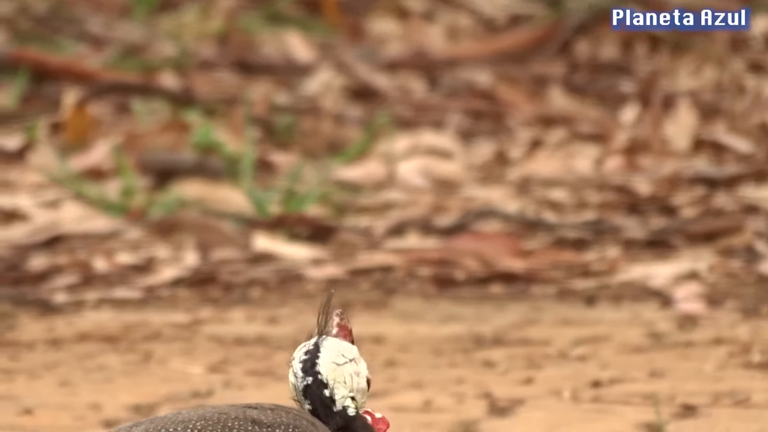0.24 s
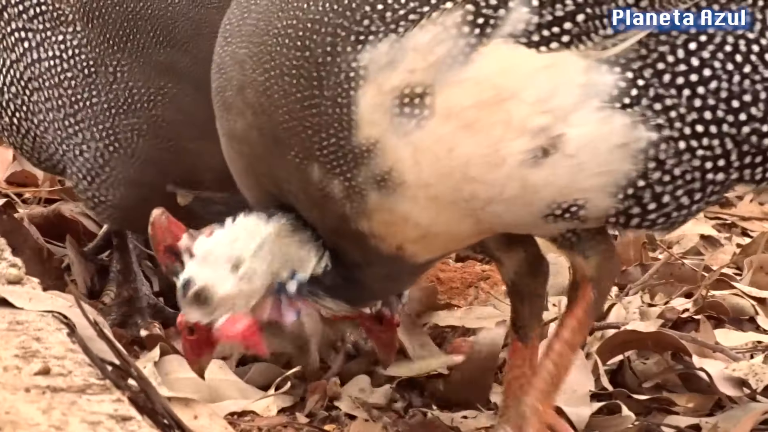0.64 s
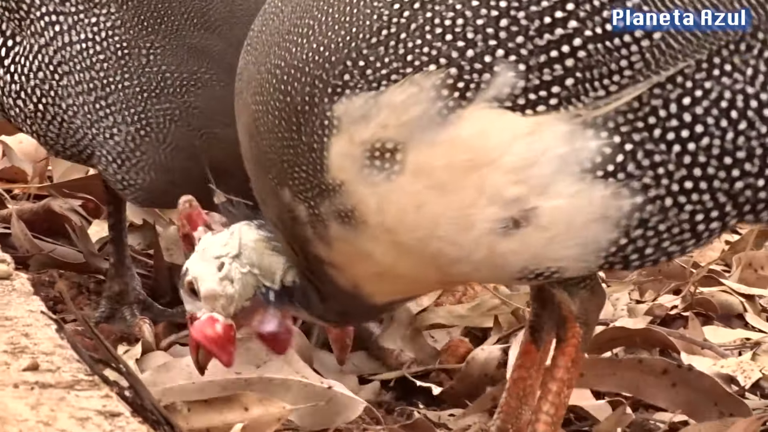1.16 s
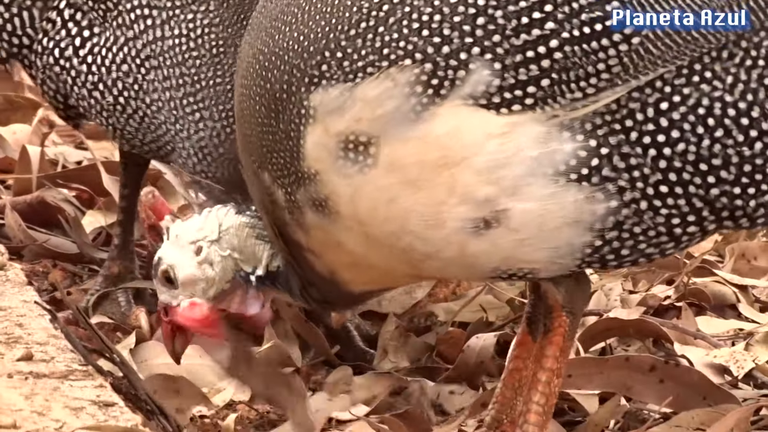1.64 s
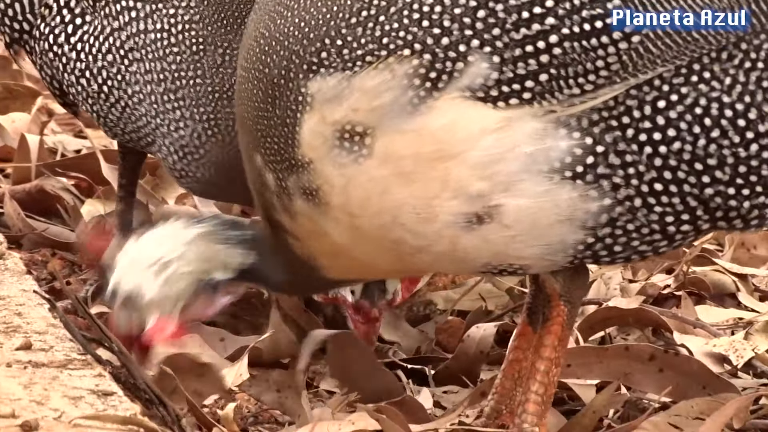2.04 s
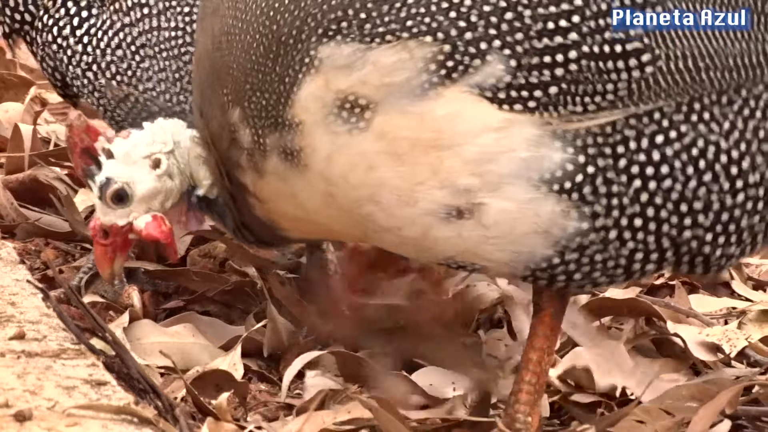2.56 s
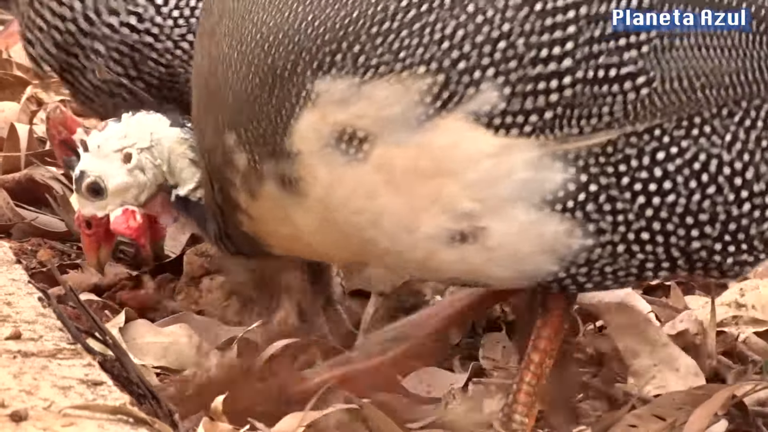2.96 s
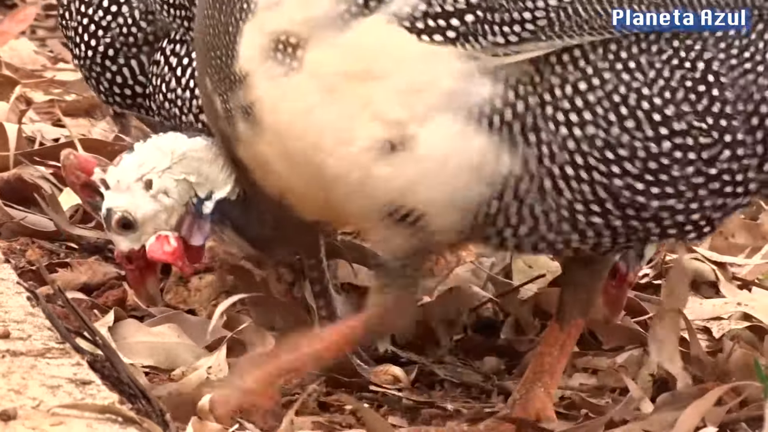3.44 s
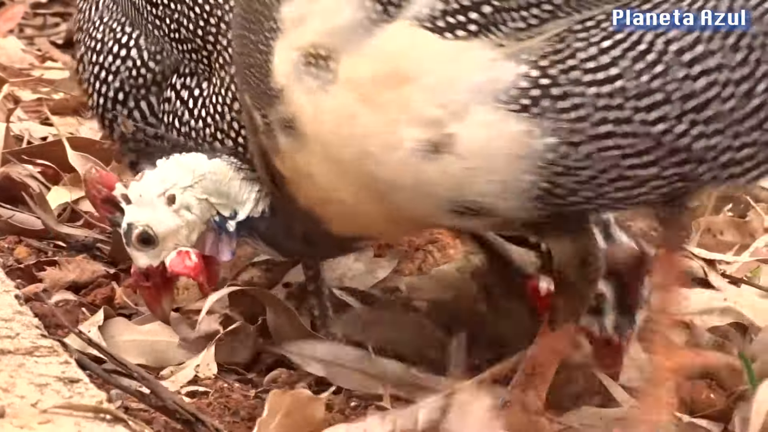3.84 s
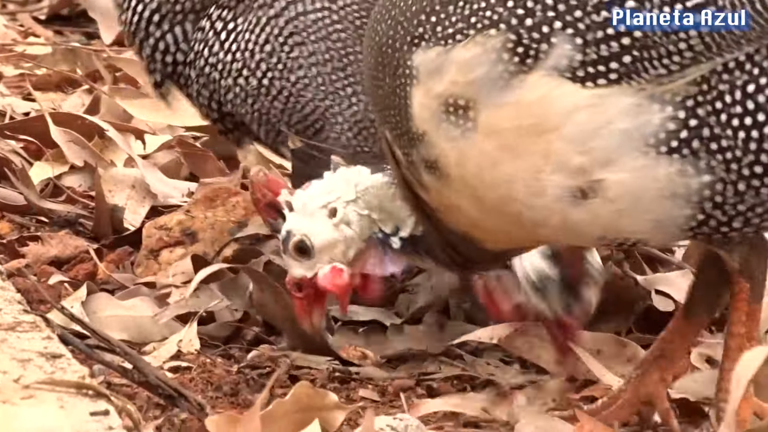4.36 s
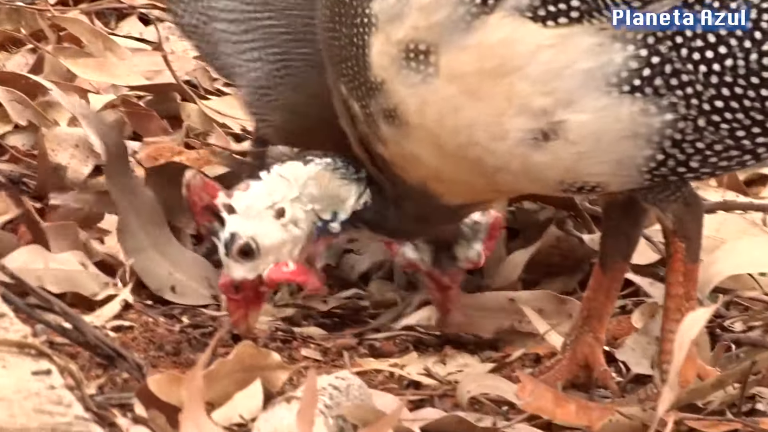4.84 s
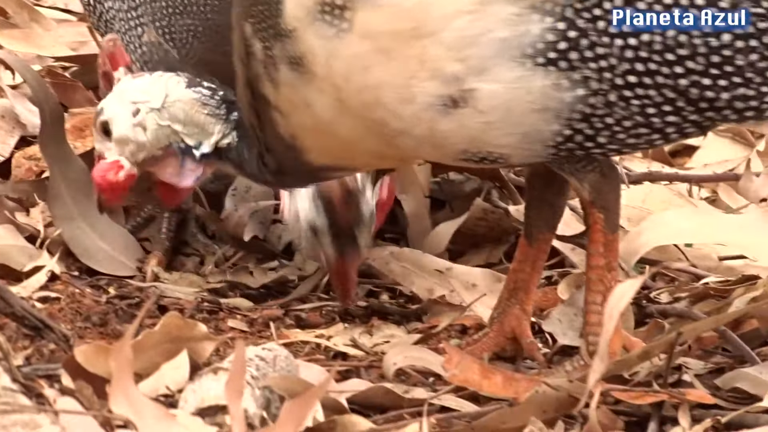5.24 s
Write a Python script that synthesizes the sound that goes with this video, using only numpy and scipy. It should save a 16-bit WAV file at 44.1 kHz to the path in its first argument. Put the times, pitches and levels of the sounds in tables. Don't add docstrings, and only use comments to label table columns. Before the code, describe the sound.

The end of a loud guineafowl cry rasps at the very start and its echo fades over breezy outdoor hiss and a thin, faint cricket tone. A soft short note at 0.45 s leads to a piercing cry at 0.6 s that ends clean. The two-syllable pattern repeats steadily, with loud cries near 1.3 s (clean), 2.1 s (raspy), 2.8 s (brief rasp, then clean), 3.55 s (mostly clean), 4.3 s (raspy) and 5.0 s (loudest, clean). Each has a strident double whistle, breathy noise and small cracks in the voice. Between cries, mates give tiny gliding peeps and faint hoarse notes. Dry leaves rustle around 1.6-1.8 s, crack sharply at 3.1 s, tick near 3.4-4.0 s and snap at 4.65 s. A last faint hoarse note and leaf crackle come near 5.45 s. Trees and walls scatter a ringing tail; the close stereo microphone is bassless and overloads.

```python
import sys
import numpy as np
from scipy import signal
from scipy.fft import rfft, irfft, next_fast_len
from scipy.io import wavfile

SR = 44100
rng = np.random.default_rng(int(sys.argv[2]) if len(sys.argv) > 2 else 0)


def to_linear_factor(level_db):
    exponent = np.asarray(level_db, float) / 20
    return 10 ** exponent


def transcribe(u):
    v = np.clip(np.atleast_2d(u).T, -1, 1)
    q = np.round(v * 32767).astype(np.int16)
    wavfile.write(sys.argv[1], SR, q)


N = 242550
LEAD = 8192
TIME = (np.arange(N + LEAD) - LEAD) / SR

# (start_s, full_swell_s, end_s, held_pitch_hz, level_db)
LOUD_SYLLABLES = [
    (-.14, -.11, -.01, 1550, -11),
    (.609, .637, .72, 1550, -8),
    (1.334, 1.377, 1.44, 1551, -8.5),
    (2.09, 2.119, 2.213, 1543, -7.5),
    (2.824, 2.856, 2.918, 1550, -7.5),
    (3.546, 3.583, 3.668, 1552, -8),
    (4.273, 4.312, 4.385, 1522, -10),
    (4.98, 5.004, 5.062, 1545, -5),
]


def at_hz(points, hz):
    table_hz, value = np.transpose(points)
    return np.interp(np.log(hz), np.log(table_hz), value)


def wobble(size, hz):
    low_pass = signal.butter(2, hz, fs=SR, output="sos")
    x = signal.sosfilt(low_pass, rng.standard_normal(size + 2000))[2000:]
    return x / x.std()


def played(rows, fade):
    s, *columns = np.transpose(rows)
    span = slice(*np.searchsorted(TIME, [s[0] - fade, s[-1] + fade]))
    t = TIME[span]
    edge = np.clip(np.minimum(t - s[0], s[-1] - t) / (2 * fade) + .5, 0, 1)
    return span, [np.interp(t, s, c) for c in columns], np.sin(np.pi / 2 * edge) ** 2


def voice(tables, orders, jitter, flutter_db, divide=1, fade=.005, effort=0, throat=((1, 0), (2, 0)), scatter=1):
    out = np.zeros(len(TIME))
    for rows in tables:
        span, (hz, level_db), edge = played(rows, fade)
        fundamental_hz = hz / divide * (1 + jitter * wobble(len(hz), 80))
        phase = 2 * np.pi * np.cumsum(fundamental_hz) / SR
        for multiple, order_db in orders:
            dulled_db = effort * np.log2(max(multiple / divide, 1)) * (level_db - level_db.max())
            throat_db = at_hz(throat, multiple * hz / divide)
            gain = to_linear_factor(level_db + order_db + dulled_db + throat_db + flutter_db * wobble(len(hz), 48.7))
            offset = scatter * rng.uniform(-np.pi, np.pi)
            out[span] += np.sqrt(2) * edge * gain * np.cos(multiple * phase + offset)
    return out


def glides(notes):
    return [[(s, a, db - 4), (s + length / 2, (a + b) / 2, db), (s + length, b, db - 4)]
            for s, length, a, b, db in notes]


def shaped(notes, shape):
    return [[(s + share * length, hz * (1 + bend / 100), db + dip_db) for share, bend, dip_db in shape]
            for s, length, hz, db in notes]


def resonant_noise(modes, source):
    out = 0
    for hz, width, db in modes:
        b, a = signal.iirpeak(hz, hz / width, fs=SR)
        band = signal.lfilter(b, a, signal.lfilter(b, a, source))
        out = -out + to_linear_factor(db + 2.0 * wobble(len(TIME), 40)) * band / band.std()
    return out / out.std()


def caller():
    rough = catches() * (whistle() + second_membrane()) + rasp() + breath()
    limited = np.tanh(rough)
    rough_low_cut = signal.butter(4, 950, "high", fs=SR, output="sos")
    return signal.sosfilt(rough_low_cut, limited) + combination_tones() + clean_endings() + soft_syllables()


def whistle():
    # (share of the lead-in 0-1, bend_percent, level_db)
    lead_shape = [(0, -8.5, -17), (.25, -8, -12), (.88, -6, -10)]
    # (share of the held note 0-1, bend_percent, level_db)
    held_shape = [(0, -1.6, -1), (.25, -.4, 0.5), (.6, 0, 0.5), (.85, .8, -2), (1, -1, -9)]
    # (multiple, level_db)
    whistle_orders = [(1, 0.5), (2, -21)]
    # (multiple, level_db)
    third_orders = [(2, -34), (4, -19), (5, -21.5), (7, -34)]
    leads = shaped([(s, swell - s, hz, db) for s, swell, end, hz, db in LOUD_SYLLABLES], lead_shape)
    helds = shaped([(swell, end - swell, hz, db) for s, swell, end, hz, db in LOUD_SYLLABLES], held_shape)
    notes = [lead + held for lead, held in zip(leads, helds)]
    pure = voice(notes, whistle_orders, jitter=.007, flutter_db=1.6)
    return pure + voice(notes, third_orders, jitter=.012, flutter_db=3.0, divide=3)


def second_membrane():
    # (start_s, length_s, pitch_hz, early_level_db, late_level_db)
    second_notes = [
        (.615, .11, 1697, -19.5, -17),
        (1.334, 0.052, 1670, -22.5, -9),
        (2.103, 0.068, 1666, -20, -30),
        (2.831, 0.11, 1688, -20, -13),
        (3.555, 0.06, 1690, -14, -12),
        (4.28, 0.07, 1680, -12, -24),
        (4.986, 0.105, 1720, -12, -17),
    ]
    tables = [[(s, hz, early - 9), (s + .35 * length, hz, early), (s + .7 * length, hz, early),
               (s + length, hz * 1.035, late)] for s, length, hz, early, late in second_notes]
    return voice(tables, [(1, 0), (2, -24), (3, -20)], jitter=.01, flutter_db=2.5)


def catches():
    # (centre_s, length_s, depth_db)
    breaks = [
        (.678, .006, -9),
        (.688, .012, -8),
        (1.388, .004, -16),
        (2.186, .012, -10),
        (2.916, .005, -16),
        (5.018, .004, -10),
        (5.056, .005, -8),
    ]
    return to_linear_factor(sum(db * np.exp(-((TIME - s) / (length / 2)) ** 2) for s, length, db in breaks))


def rasp():
    # (start_s, length_s, fifth_harmonic_hz, level_db)
    rasp_notes = [
        (-.03, 0.103, 1776, -6.5),
        (2.215, 0.076, 1690, -7.5),
        (2.914, 0.04, 1760, -7),
        (3.705, 0.035, 1744, -15.5),
        (4.36, 0.0514, 1689, -7),
        (4.41, 0.051, 1770, -7),
    ]
    # (share of the note 0-1, bend_percent, level_db)
    rasp_shape = [(0, 4.5, 2.5), (0.302, .5, -2.6), (.55, -.5, 0.5), (.78, 5, -4.5), (1, 0.5, -11)]
    # (frequency_hz, level_db)
    rasp_throat = [(900, -36), (1400, -18), (1750, -4.5), (2100, -14), (2700, -18), (3700, -20),
                   (4400, -19), (6200, -28), (8000, -38)]
    rasp_orders = [(k, at_hz(rasp_throat, 350 * k)) for k in range(3, 23)]
    return voice(shaped(rasp_notes, rasp_shape), rasp_orders, jitter=.014, flutter_db=3.0, divide=5,
                 fade=.008, scatter=.4)


def breath():
    # (frequency_hz, width_hz, level_db)
    roar_modes = [(1300, 340, -34), (1711, 430, 10), (2524, 1600, 6.5), (3100, 960, 4), (3880, 1470, 0)]
    beak_modes = [(4500, 260, -5), (4800, 220, 0), (5280, 300, -3), (6900, 900, -12)]
    whistling_modes = [(9070, 6700, 4), (10700, 480, 3), (10830, 640, -1.5)]
    # (start_s, length_s, roar_db, beak_db, whistling_db)
    gusts = [(-.1, 0.17, -14.5, -42, -36), (.605, 0.19, -17.5, -29, -33), (1.335, 0.18, -22.5, -26.5, -32),
             (2.095, 0.19, -16, -25, -31), (2.826, 0.18, -17, -28.5, -30), (3.55, 0.15, -14, -22.5, -29.5),
             (4.275, 0.166, -17.5, -24.5, -30.5), (4.98, .17, -19.5, -28.5, -30)]
    # (share of the gust 0-1, roar_db, beak_db, whistling_db)
    gust_shape = [(0, -8.5, -11.5, -7.5), (.2, -20, 0.5, -3), (.5, 0.5, -4.5, 1.8), (.77, -3.5, -5.5, -5.5),
                  (1, -13, -4, -9.5)]
    # (start_s, length_s, roar_db, beak_db, whistling_db)
    puffs = [(1.19, 0.11, -29, -51, -60), (1.935, 0.15, -28, -29.5, -42), (2.64, 0.071, -28, -32, -44),
             (3.39, 0.11, -25.5, -26.5, -41), (4.115, 0.066, -26.5, -29, -38.5),
             (4.82, 0.046, -27, -30, -37), (5.45, 0.11, -33.5, -27, -58), (2.215, 0.069, -22.5, -24, -47),
             (2.98, 0.048, -28, -24, -40), (4.39, 0.061, -22, -25, -45), (5.13, 0.038, -30, -26, -39)]
    # (share of the puff 0-1, roar_db, beak_db, whistling_db)
    puff_shape = [(0, -7, -14.5, .1), (.55, 0.6, -7.1, -5), (1, -3.5, -15.5, -14)]
    air, out = rng.standard_normal(len(TIME)), np.zeros(len(TIME))
    noises = [resonant_noise(roar_modes, flapping(air_share=1.3)),
              resonant_noise(beak_modes, air),
              resonant_noise(whistling_modes, air)]
    for rows in airflow(gusts, gust_shape) + airflow(puffs, puff_shape):
        span, levels, edge = played(rows, fade=.008)
        for noise, level_db in zip(noises, levels):
            out[span] += edge * to_linear_factor(level_db + 1.5) * noise[span]
    return out


def flapping(air_share):
    flap_hz = 170.5
    cycles = np.cumsum(flap_hz * (1 + .025 * wobble(len(TIME), 35))) / SR
    pulses = np.diff(np.floor(cycles), prepend=0) * to_linear_factor(1.5 * rng.standard_normal(len(TIME)))
    return pulses / pulses.std() + air_share * rng.standard_normal(len(TIME))


def airflow(rows, shape):
    return [[(s + share * length, *np.add(levels, dips)) for share, *dips in shape] for s, length, *levels in rows]


def combination_tones():
    # (start_s, length_s, level_db)
    sum_flares = [(.618, .04, -25), (1.345, .05, -19), (2.11, .034, -16), (2.832, .048, -19),
                  (3.56, .035, -20), (4.285, .05, -28), (4.985, .045, -20)]
    # (share of the flare 0-1, bend_percent, level_db)
    sum_shape = [(0, 1.5, -9), (.35, .5, 0), (.7, -1.5, 0), (1, -4, -14)]
    # (start_s, length_s,
    # first_pitch_hz, last_pitch_hz, level_db)
    higher_tones = [(1.4, .035, 3120, 3080, -19), (2.13, .03, 4780, 4800, -22),
                    (2.192, .014, 3120, 3120, -17), (2.228, .018, 3740, 3740, -19),
                    (2.885, .022, 3110, 3110, -19), (3.572, .04, 4800, 4720, -20),
                    (4.315, .05, 4700, 4850, -22), (4.378, .045, 3700, 3760, -22),
                    (5.03, .018, 3110, 3110, -17), (5.045, .06, 4150, 4300, -27)]
    octaves = [(row[0], .025, 2790, 2870, row[4] - 20) for row in LOUD_SYLLABLES]
    sums = shaped([(s, length, 2315, db) for s, length, db in sum_flares], sum_shape)
    return voice(sums + glides(higher_tones + octaves), [(1, 0)], jitter=.01, flutter_db=2.5)


def clean_endings():
    # (start_s, held_length_s, lowest_second_harmonic_hz, level_db, weaker_at_onset_db)
    clean_notes = [
        (.724, .053, 1972, -5, 2.5),
        (1.427, .07, 1973, -5, 4.5),
        (2.947, 0.04, 1967, -3, 1),
        (3.667, 0.036, 1960, -4.5, -0.5),
        (5.05, 0.076, 1962, -3.5, 6),
    ]
    # (share of the held tone 0-1, bend_percent, level_db)
    clean_shape = [(0, 2.8, -2), (.25, 1.3, -1), (.65, 0.1, -0.3), (1, 1.5, -0.8)]
    # (later_s, bend_percent, level_db)
    flip = [(.012, 5.5, -5.5), (.021, 7.5, -12), (.031, 8.3, -21)]
    # (start_s, length_s, first_pitch_hz, last_pitch_hz, level_db)
    flickers = [
        (2.205, 0.05, 2050, 2021, -12.5),
        (4.388, 0.026, 2019, 2010, -8),
        (4.435, 0.02, 2105, 2067, -15),
    ]
    # (multiple, level_db)
    clean_orders = [(1, -25.5), (2, -1), (3, -13), (4, -25), (5, -13.5), (6, -18.5), (7, -23), (8, -31.5),
                    (9, -36.5), (10, -41), (11, -34)]
    # (frequency_hz, level_db)
    clean_throat = [(3950, 0), (4200, 11), (4800, 0), (5250, 2), (5900, 0), (6150, 2), (7000, 0)]
    tables = []
    for s, length, hz, db, weaker_db in clean_notes:
        held = [(s + share * length, hz * (1 + bend / 100), db + dip_db - weaker_db * max(1 - share / 0.82, 0))
                for share, bend, dip_db in clean_shape]
        upturn = [(s + length + later, hz * (1 + bend / 100), db + dip_db) for later, bend, dip_db in flip]
        tables.append(held + upturn)
    return voice(tables + glides(flickers), clean_orders, jitter=.003, flutter_db=.6, divide=2, effort=1.0,
                 throat=clean_throat, scatter=.25)


def soft_syllables():
    # (start_s, length_s, pitch_hz, level_db)
    soft_notes = [(.448, 0.038, 932, -28), (1.187, 0.027, 936, -26.5), (1.936, 0.033, 922, -25.5),
                  (2.672, 0.035, 935, -27), (3.389, 0.032, 948, -23.5), (4.118, 0.022, 936, -27),
                  (4.821, 0.024, 958, -31)]
    # (share of the note 0-1, bend_percent, level_db)
    soft_shape = [(0, 1.5, -12), (.2, .5, -2), (.5, 0, -1.5), (.8, -.3, -2.5), (1, -1, -11)]
    # (start_s, length_s, first_pitch_hz, last_pitch_hz, level_db)
    after_notes = [(1.268, .02, 1060, 1080, -38), (1.298, .02, 1090, 1075, -36),
                   (2.008, 0.022, 1090, 1020, -32), (2.04, 0.054, 1036, 1120, -37),
                   (2.698, 0.041, 1105, 1066, -31), (3.465, 0.026, 1085, 1000, -32),
                   (4.193, 0.016, 1095, 1030, -32), (4.209, .02, 1020, 1025, -34)]
    # (multiple, level_db)
    soft_orders = [(1, -6), (2, 6.5), (3, -3.5), (4, -39), (6, -15), (9, -13), (10, -24)]
    return voice(shaped(soft_notes, soft_shape) + glides(after_notes), soft_orders, jitter=.004, flutter_db=.8,
                 fade=.003, scatter=.25)


def flock():
    # (start_s, length_s, first_pitch_hz, last_pitch_hz, level_db)
    peep_notes = [(.52, 0.098, 1700, 1800, -28.5), (.585, 0.017, 1624, 1680, -23),
                  (.495, .02, 1480, 1490, -29.5), (1.235, 0.054, 1650, 1740, -33),
                  (1.615, 0.145, 1532, 1595, -33), (4.295, 0.04, 2765, 2860, -27),
                  (2.115, 0.081, 9800, 9100, -42), (1.96, 0.041, 1576, 1780, -30.5),
                  (1.985, 0.037, 1530, 1490, -27), (2.6, .06, 1800, 1900, -34),
                  (2.63, 0.062, 2430, 3000, -39), (3.35, 0.05, 3120, 3180, -35),
                  (3.425, 0.048, 1690, 1720, -27), (3.765, 0.024, 3062, 3000, -30),
                  (4.093, .025, 2900, 3050, -34), (4.143, .012, 3050, 3080, -31),
                  (1.965, .025, 3330, 3480, -31), (4.116, 0.013, 1483, 1300, -20.5),
                  (4.116, 0.013, 2330, 2250, -28), (4.15, 0.042, 1615, 1690, -25),
                  (4.458, 0.026, 3060, 3090, -26), (4.822, 0.017, 1294, 1270, -27),
                  (4.822, 0.026, 2240, 2270, -29), (4.838, 0.0086, 1700, 1550, -16),
                  (4.842, 0.015, 1435, 1350, -20.5)]
    hoarse_notes = [(1.228, .075, 635, 680, -38), (1.612, 0.094, 665, 667, -32),
                    (2.015, .05, 610, 645, -34), (3.43, 0.079, 640, 690, -34), (4.14, .055, 620, 660, -38),
                    (5.452, 0.065, 650, 744, -27)]
    # (multiple, level_db)
    hoarse_orders = [(4, -2.5), (5, -4), (6, -15), (9, -12), (10, -11.5)]
    peeps = voice(glides(peep_notes), [(1, 0), (2, -16)], jitter=.008, flutter_db=1.5)
    return peeps + voice(glides(hoarse_notes), hoarse_orders, jitter=.01, flutter_db=2.5)


def leaves():
    # (start_s, peak_db, centre_hz, t60_s); the burst at 5.475 s roughens a hoarse note instead
    cracks = [(1.222, -24, 2500, .02), (1.227, -24, 2500, .02), (3.44, -22, 3800, .1),
              (0.192, -18.5, 2800, 0.046), (1.785, -21, 3300, 0.2), (1.796, -19, 4000, 0.12),
              (3.097, -13, 3000, 0.05), (3.104, -14, 3800, 0.18), (3.815, -23, 8000, 0.038),
              (3.825, -40, 8500, .03), (3.938, -26, 7500, .02), (3.951, -21.5, 7500, 0.014),
              (3.984, -21.5, 7550, 0.038), (4.02, -26, 7660, .03), (1.615, -23.5, 6700, 0.4),
              (1.66, -21, 6700, 0.71), (1.7, -37, 8440, 0.036), (4.218, -21, 7500, 0.018),
              (4.385, -28, 8750, .02), (3.332, -32, 6450, 0.027), (3.45, -23, 7000, .025),
              (3.486, -22, 7900, .025), (3.698, -19, 9000, .02), (5.475, -25, 6440, 0.22),
              (4.588, -19, 8800, .02), (4.727, -28, 8500, .02), (4.757, -27, 8000, .025),
              (1.14, -29, 8600, .04), (4.64, -13.5, 2320, 0.049), (4.652, -16, 2950, 0.021),
              (4.728, -19.5, 5500, 0.011), (4.757, -37, 3230, 0.037)]
    out, t = np.zeros(len(TIME) + 4096), np.arange(4096) / SR
    for s, peak_db, hz, t60 in cracks:
        burst = rng.standard_normal(len(t)) * to_linear_factor(-60 * t / t60) * np.minimum(t / 0.0017, 1)
        leaf_band = signal.butter(2, [hz / 1.65, hz * 1.29], "band", fs=SR, output="sos")
        burst = signal.sosfilt(leaf_band, burst)
        at = LEAD + round(s * SR)
        out[at:at + len(t)] += to_linear_factor(peak_db) * burst / np.abs(burst).max()
    return out[:len(TIME)]


def ports(x):
    # (frequency_hz, left_lead_rad)
    port_phase = [(950, -0.5), (4000, -0.41), (11000, -0.66)]
    size = next_fast_len(len(x))
    hz = np.arange(1, size // 2 + 2) * SR / size
    half_turn = np.exp(.5j * at_hz(port_phase, hz))
    return irfft(rfft(x, size) * np.array([half_turn, half_turn.conj()]), size)[:, :len(x)]


def surroundings(x, tail_db, alike):
    # (centre_hz, t60_s, level_db)
    tail_bands = [(1000, 0.89, -5), (1550, 0.82, -2.5), (1930, 0.44, -8), (3000, 0.64, 1.5),
                  (4900, 0.68, 2.5), (10300, 0.55, -7)]
    # (delay_s, level_db)
    echoes = [
        (.058, -22),
    ]
    t, response = np.arange(SR) / SR, 0
    centres = np.array(tail_bands)[:, 0]
    edges = [600, *np.sqrt(centres[1:] * centres[:-1]), 14000]
    for (hz, t60, band_db), low, high in zip(tail_bands, edges, edges[1:]):
        band = signal.butter(2, [low, high], "band", fs=SR, output="sos")
        mid, side = signal.sosfilt(band, rng.standard_normal((2, SR)))
        envelope = to_linear_factor(band_db - 60 * t / t60 + 3.0 * wobble(SR, 18))
        response = response + (mid + np.sqrt(1 - min(alike, 1)) * side * [[1], [-1]]) * envelope
    response = to_linear_factor(tail_db) * response * np.minimum(t / 0.0025, 1) / np.sqrt(np.sum(response ** 2) / 2)
    for k, (delay, db) in enumerate(echoes):
        response[[0, 1], round(delay * SR) + np.array([0, 3 * (-1) ** k])] += to_linear_factor(db)
    swayed = np.interp(TIME + .00004 * wobble(len(x), 14), TIME, x)
    return signal.fftconvolve(swayed[None], response, axes=1)[:, :len(x)]


def outdoors(patchy_db):
    # (frequency_hz, density_db_per_hz)
    air_spectrum = [(240, -66), (400, -31), (907, -7.5), (985, 0), (1370, 6), (2050, 5.5), (2300, 4.5),
                    (2910, 0.5), (3480, -1.5), (7890, -7.5), (11000, -24), (14300, -81), (22000, -120)]
    # (frequency_hz, left_right_likeness)
    likeness = [(800, 0.69), (3000, 0.71), (11000, 0.83)]
    # (time_s, lift_db)
    breeze = [(0, 5), (.85, 8.5), (2.7, 3), (4.6, 8), (5.3, -1.5)]
    out, edges = 0, 400 * 2 ** np.arange(0, 5.1, 1 / 3)
    white = rng.standard_normal((2, 2, N))
    breeze_db = np.interp(TIME[LEAD:], *np.transpose(breeze))
    for k, (low, high) in enumerate(zip(edges, edges[1:])):
        band = signal.butter(2, [low, high], "band", fs=SR, output="sos")
        mid, side = signal.sosfilt(band, white[k % 2])
        hz = np.sqrt(low * high)
        alike = np.clip(at_hz(likeness, hz), -1, 1)
        gain = to_linear_factor(at_hz(air_spectrum, hz) + patchy_db * wobble(N, 19) + breeze_db * (hz / 9000) ** 2)
        out = out + gain * (np.sqrt(1 + alike) * mid + np.sqrt(1 - alike) * side * [[1], [-1]])
    return to_linear_factor(-32.5) * out / out.std()


def cricket():
    tone = resonant_noise([(2664, 40, 0)], rng.standard_normal(len(TIME)))
    return to_linear_factor(-46.5 + 1.1 * wobble(N, 1.2)) * tone[LEAD:]


def scene():
    close = caller() + flock() + leaves()
    near = ports(close) * to_linear_factor(np.array([[-.2], [.2]]))
    far = surroundings(close, tail_db=-13.5, alike=0.94)
    return (near + far)[:, LEAD:] + outdoors(patchy_db=1.93) + cricket()


def top_cut(x):
    return signal.sosfilt(signal.butter(12, 21000, fs=SR, output="sos"), x)


def record(dry):
    led_in = np.hstack([dry[:, 999::-1], dry])
    thin = signal.sosfilt(signal.butter(6, 600, "high", fs=SR, output="sos"), led_in)
    narrow = signal.sosfilt(signal.ellip(12, .5, 85, 11000, fs=SR, output="sos"), thin)
    clipped = np.clip(narrow, -1, 1)
    topped = signal.sosfilt(signal.cheby2(10, 30, 16200, fs=SR, output="sos"), clipped)[:, 1000:]
    return top_cut(topped)


dry = scene()
out = record(dry)
transcribe(out)
```